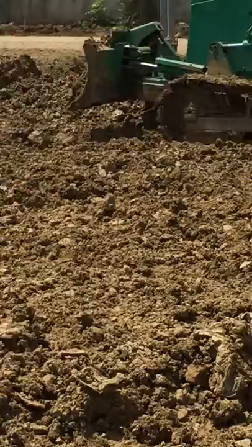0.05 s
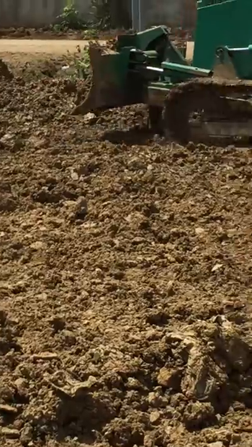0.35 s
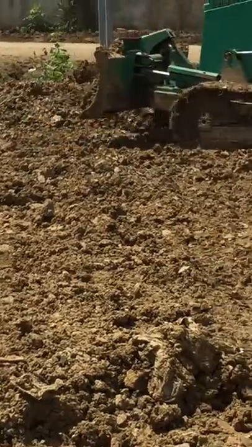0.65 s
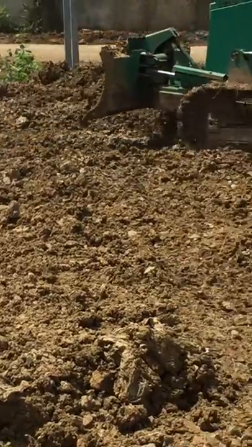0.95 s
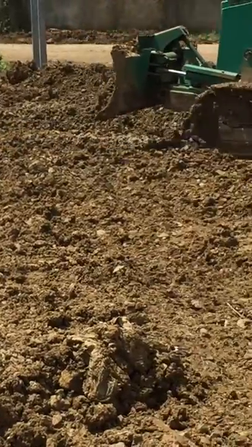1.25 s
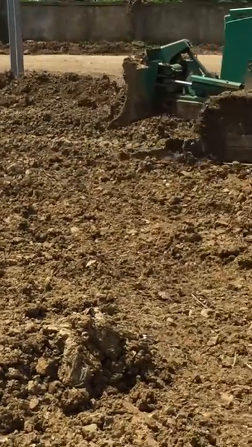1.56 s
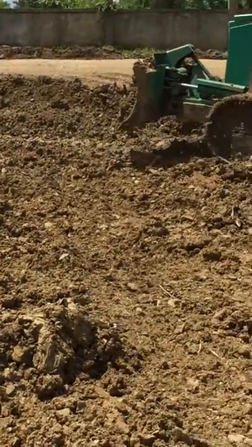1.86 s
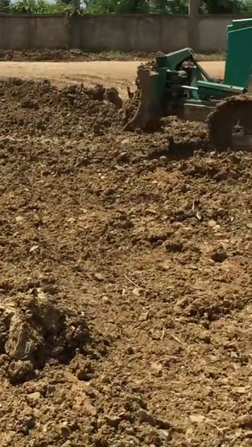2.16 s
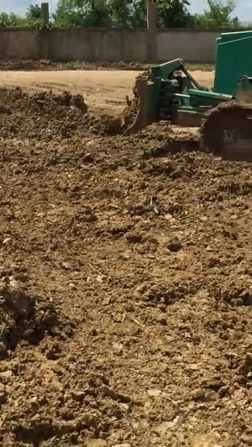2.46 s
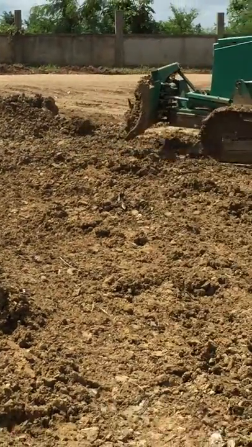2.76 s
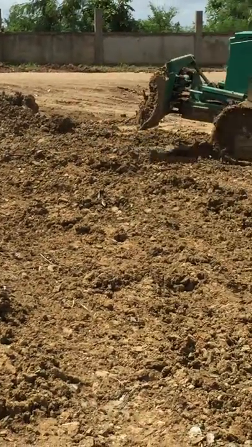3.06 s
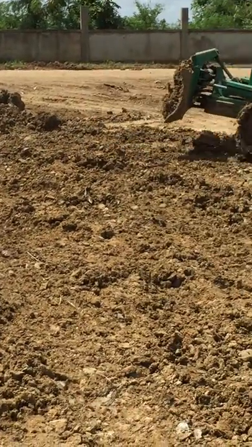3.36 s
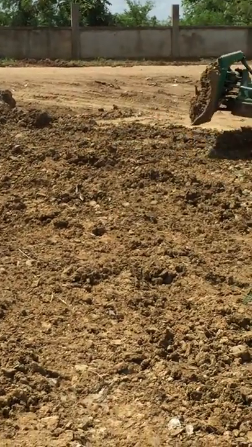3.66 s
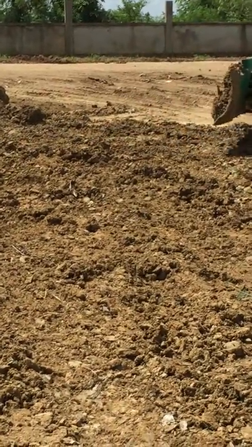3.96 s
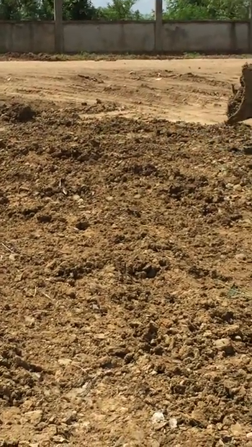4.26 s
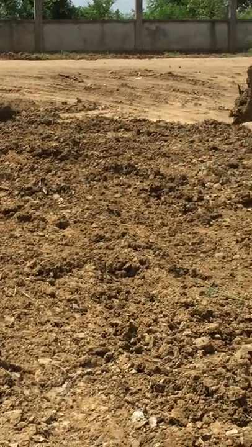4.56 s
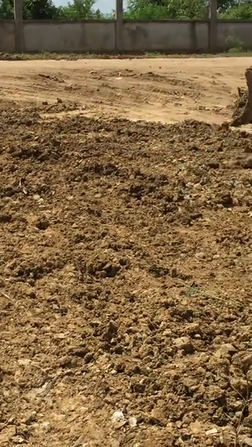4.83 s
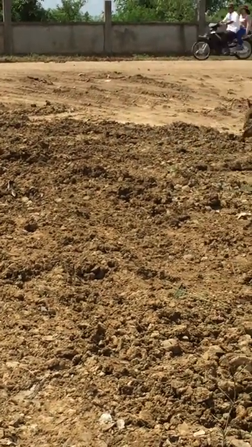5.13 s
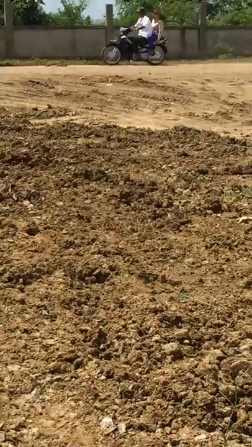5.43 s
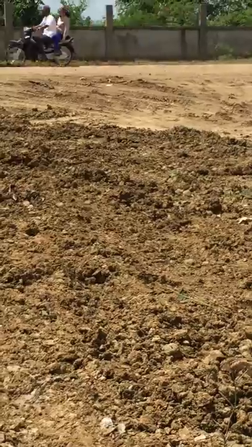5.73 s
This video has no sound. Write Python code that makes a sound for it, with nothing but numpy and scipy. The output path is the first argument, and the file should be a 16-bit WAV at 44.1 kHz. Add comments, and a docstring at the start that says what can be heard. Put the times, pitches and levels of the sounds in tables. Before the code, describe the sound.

A small bulldozer's diesel drones and throbs while its steel tracks rattle, clank and squeal over stony soil, then the clatter falls away.

```python
"""A small bulldozer crawls over an open dirt lot, about ten metres away. From the start its four-cylinder
diesel drones through the exhaust and the block knocks with every firing; within a second the throb of
one weak cylinder grows. For two seconds the blade grinds through stony soil. The steel tracks rattle,
clank and now and then squeal, crushing clods and pebbles, with a faint echo off a far wall. After five
seconds the machine slows: the clatter falls away, dry pins squeal and the engine runs free."""
import sys
import numpy as np
from scipy import signal
from scipy.fft import rfft, irfft
from scipy.io import wavfile

SR = 44100
rng = np.random.default_rng(int(sys.argv[2]) if len(sys.argv) > 2 else 0)


def transcribe(u):
    """Save the signal u as a 16-bit wav file named by the first command-line argument.

    u: samples, shape (n,) or (channels, n), limited to [-1, 1]; the rate is SR.
    q: integer samples, one column per channel.
    """
    v = np.clip(np.atleast_2d(u).T, -1, 1)
    q = np.round(v * 32767).astype(np.int16)
    wavfile.write(sys.argv[1], SR, q)


N = 259749
T = np.arange(N) / SR

# The blade grinding through stony soil. Each row: time in seconds, level in dB.
GRIND_LEVELS = [(0, -38.5), (.65, -37.5), (1.3, -46.5), (1.9, -44), (2.4, -71)]
# The ring of the blade. Each row: pitch in Hz, relative level in dB, 60 dB decay in seconds.
BLADE_MODES = [(971, -11, 0.1), (1230, -3.5, 0.033), (1567, -3, 0.026), (1700, -21, 0.016),
               (1990, -1, 0.012), (2390, -7, 0.013), (2920, -17, 0.052), (3370, -4.5, 0.0064)]
# The colour of crushed soil and grit. Each row: frequency in Hz, relative level in dB.
SOIL_COLOUR = [(500, 13.5), (1500, 9), (2800, 18.5), (4300, -7), (5000, -15), (6200, 4), (7500, -3),
               (9700, 3.5), (10500, -2), (12500, 1), (15500, -7)]
# A steel edge scraped by grit. Each row: pitch in Hz, relative level in dB, 60 dB decay in seconds.
EDGE_MODES = [(3600, 1, .007), (4480, 1, .012), (5650, 0, .006), (6500, -2, .004), (7400, -4, .003),
              (9400, -7, .005)]
# Clods crushed under the shoes. Each row: start and length in seconds, grit and scrape in relative dB.
CLODS = [(0.612, 0.037, -51, -46), (0.647, 0.052, -53, -51), (0.71, 0.04, -50, -43), (0.92, 0.03, -54, -51),
         (1.028, 0.058, -54, -50), (1.135, 0.078, -54, -51), (1.606, 0.03, -57, -52),
         (1.68, 0.035, -52, -42), (1.72, 0.125, -54, -46.5), (1.918, 0.036, -57, -50),
         (2.121, 0.042, -54, -51), (2.19, 0.07, -57, -51), (2.325, 0.044, -55, -51),
         (2.387, 0.042, -53, -50), (2.48, 0.058, -53, -48), (2.774, 0.048, -54, -51),
         (2.86, 0.032, -57, -52), (2.897, 0.032, -56, -51), (2.975, 0.044, -51, -51),
         (3.23, 0.025, -58, -52), (3.324, 0.058, -56, -51), (3.461, 0.04, -50, -42.5),
         (3.562, 0.05, -54, -49), (3.809, 0.032, -56, -54), (4.067, 0.056, -53, -48),
         (4.125, 0.032, -57, -50), (4.204, 0.05, -54, -47), (4.328, 0.022, -54, -47),
         (4.41, 0.115, -54, -47), (4.981, 0.062, -54, -48)]
# Dry track pins squealing. Each row: start and length in seconds, first and last pitch in Hz,
# level in dB, pitch waver in Hz.
SQUEALS = [(0.124, 0.26, 15700, 15700, -47.5, 40), (.618, .009, 7030, 6960, -44, 120),
           (0.717, 0.012, 5980, 5940, -40, 260), (2.983, 0.01, 7460, 7440, -51, 150),
           (3.672, .12, 14910, 15020, -55, 50), (3.736, .073, 15620, 15500, -57, 50),
           (4.307, 0.023, 6540, 6520, -40, 36), (4.934, .06, 15740, 15700, -52, 28),
           (5.055, 0.15, 2680, 2670, -48.5, 26), (5.06, 0.16, 14690, 14640, -57, 28),
           (5.08, .08, 8030, 8000, -63, 20), (5.24, .045, 5860, 5740, -55, 20),
           (5.245, 0.071, 11600, 11350, -61, 50), (5.275, 0.07, 5690, 5680, -47, 22),
           (5.335, .06, 5750, 5700, -54, 30), (5.385, 0.075, 5685, 5680, -52, 16),
           (5.45, .06, 5690, 5730, -55, 20), (5.666, 0.03, 6710, 6600, -56, 200),
           (5.68, .03, 7850, 8000, -61, 200), (5.708, .022, 7500, 6950, -55, 300),
           (5.756, 0.07, 12950, 12450, -53, 130), (5.785, .035, 11800, 11700, -52, 150)]
# The pace of the tracks. Each row: time in seconds, shoes laid down per second.
SHOE_PACE = [(0, 9.2), (1.4, 9.2), (2.1, 10.5), (2.7, 10), (3.2, 8), (3.85, 11), (4.5, 9.5), (5.89, 9.4)]
# The work of the tracks, dropping as the machine slows. Each row: time in seconds, then frame thud,
# shoe ring and crumbling soil in relative dB.
TRACK_LEVELS = [(0, -43.5, -49, -61), (.5, -38.5, -44, -60), (.85, -36, -45, -52.5), (1.3, -37.5, -45, -59),
                (1.9, -38.5, -44.5, -60), (2.6, -36, -42, -57), (3.1, -42, -48.5, -63),
                (4.25, -39.5, -40.5, -57), (5.0, -45, -43.5, -59), (5.3, -49.5, -43.5, -57.5),
                (5.5, -65, -56, -67)]
# The colour of the rattling track frame. Each row: frequency in Hz, relative level in dB.
FRAME_COLOUR = [(120, -7.5), (220, 12.5), (330, 9.5), (430, 7.5), (520, 10.5), (700, -6), (880, -3),
                (1100, 3), (1500, -13), (2300, -20), (3500, -23), (6000, -30), (12000, -52)]
# The free ring of a track shoe. Each row: pitch in Hz, relative level in dB, 60 dB decay in seconds.
SHOE_MODES = [(301, 0.5, 0.043), (327, -2.5, 0.14), (381.7, -2.5, 0.16), (505, -20, 0.44),
              (549, 2.5, 0.076), (658, 3, 0.046), (778, 2.5, 0.038), (876, 2, 0.049), (1004, 9.5, 0.032),
              (1085, -3.5, 0.092), (1190, -4, 0.076), (1344, -1.5, 0.12), (1440, 2, 0.052),
              (1930, -18, 0.074), (2050, 7.5, 0.0079), (2270, -12, 0.19), (2800, -9.5, 0.018),
              (3530, -38, 0.036)]
# Steel cracking on steel, before each blow retunes it. Each row: frequency in Hz, relative level in dB.
CRACK_COLOUR = [(500, -18), (1200, 7.5), (1800, 6), (2300, 12), (2900, 3.5), (3700, 2), (4400, -2.5),
                (5300, -17), (9000, -22), (15000, -28)]
# Shoes striking rollers and sprocket. Each row: start in seconds, ring level in dB, ring focus in Hz,
# thud level in dB, crack level in dB, crack peak in Hz.
CLANKS = [(.39, -29, 400, -28, -46, 1600), (.496, -28, 420, -27, -46, 1600),
          (.6, -27, 1230, -33, -44, 1600), (.654, -27, 1100, -34, -44, 1600),
          (.712, -36, 1020, -38, -29, 2600), (.729, -24, 1100, -36, -38, 2300),
          (.828, -26, 500, -23, -39, 2300), (.91, -26, 530, -29, -46, 1600),
          (.952, -25.5, 900, -27, -42, 1600), (1.035, -23, 1320, -38, -26, 2000),
          (1.058, -25, 1000, -23, -42, 1600), (1.124, -27, 1080, -26, -44, 1800),
          (1.159, -26, 1010, -28, -44, 1800), (1.256, -24, 1240, -31, -39, 1600),
          (1.272, -25, 600, -24, -45, 1600), (1.358, -26, 484, -33, -30, 1900),
          (1.385, -22, 1000, -30, -44, 1600), (1.479, -21, 1210, -21, -28.5, 2000),
          (1.558, -25, 560, -28, -46, 1600), (1.591, -26, 500, -30, -46, 1600),
          (1.659, -19, 1100, -38, -41, 1500), (1.695, -24, 790, -30, -36, 2600),
          (1.768, -22, 1090, -37, -48, 1600), (1.795, -19, 1050, -20, -26, 2300),
          (1.872, -25, 585, -25, -46, 1600), (1.909, -28, 510, -24, -24, 2500),
          (2.034, -26, 480, -24, -42, 1600), (2.07, -25, 400, -26, -46, 1600),
          (2.149, -26, 690, -30, -37, 1800), (2.267, -22, 500, -26, -44, 1600),
          (2.337, -26, 500, -24, -42, 1800), (2.405, -22, 720, -36, -44, 1600),
          (2.48, -26, 590, -36, -35, 2300), (2.526, -24, 450, -27, -44, 1600),
          (2.585, -18, 690, -19, -29, 2100), (2.647, -23, 1000, -28, -36, 1700),
          (2.698, -15.5, 1180, -23, -30, 1400), (2.789, -26, 775, -27, -40, 2300),
          (2.876, -17, 910, -19, -42, 1500), (2.909, -26, 500, -23, -40, 1800),
          (3.002, -16, 730, -26, -30, 2000), (3.23, -25, 500, -24, -42, 2300),
          (3.272, -21, 1100, -31, -42, 1500), (3.305, -22, 1020, -29, -38, 1600),
          (3.342, -18, 1020, -24, -38, 1600), (3.441, -25, 730, -27, -48, 1600),
          (3.478, -15.5, 700, -24, -34, 1800), (3.668, -19.5, 950, -20, -38, 1400),
          (3.712, -24, 495, -26, -27, 2200), (3.763, -21, 520, -24, -40, 1800),
          (3.849, -25, 720, -25, -44, 1600), (3.887, -25, 600, -24, -44, 1600),
          (4.032, -23, 835, -32, -46, 1600), (4.074, -21, 820, -33, -35, 3600),
          (4.126, -22, 820, -31, -39, 2300), (4.211, -21, 700, -33, -30, 2300),
          (4.236, -19.5, 820, -20, -33, 2300), (4.292, -23, 1200, -25, -28.5, 3100),
          (4.333, -20, 745, -38, -32, 2400), (4.399, -24, 680, -27, -44, 1600),
          (4.429, -25, 570, -24, -40, 2300), (4.472, -23, 880, -30, -26.5, 2100),
          (4.829, -26, 660, -25, -46, 1600), (4.869, -25, 500, -25, -40, 2300),
          (5.034, -24, 850, -29, -38, 1800), (5.262, -26, 805, -30, -46, 1600)]
# The combustion knock of the block. Each row: time in seconds, relative level in dB.
KNOCK_LEVELS = [(0, -44), (2, -39), (4.8, -38.5), (5.5, -43.5), (5.89, -41.5)]
# The colour of the block and its fan. Each row: frequency in Hz, relative level in dB.
BLOCK_COLOUR = [(150, -17.5), (350, -.5), (460, -2.5), (600, -2.5), (700, 5.5), (820, 4.5), (930, -3),
                (1050, -5), (1200, 4.5), (1400, -1), (1800, -1.5), (2100, -3.5), (2900, -8.5),
                (4000, -16.5), (6500, -20.5), (9700, -28.5), (10500, -31), (15500, -29.5)]
# The ring of the engine covers. Each row: pitch in Hz, relative level in dB, 60 dB decay in seconds.
COVER_MODES = [(700, 2, 0.017), (824, -5, 0.016), (1140, -20, 0.03), (1190, -7, 0.036), (1508, -3.5, 0.081),
               (1730, -34, 0.015), (1800, 3.5, 0.028), (2384, -16, 0.066), (2670, -21, 0.023)]
# Casing tones locked to the shaft. Each row: time in seconds, hum in dB, gear whine in dB.
CASING_LEVELS = [(0, -51, -55), (3, -54.5, -48), (4.3, -55, -76), (5.05, -54, -53), (5.35, -44.5, -52),
                 (5.89, -46, -51.5)]
# The casing hum and the gear whine. Each row: multiple of the firing rate, relative level in dB.
HUM_PARTIALS = [(6, 0), (12, -12), (13, -16), (14, -15)]
GEAR_PARTIALS = [(20, 0), (22, -8), (27, -9)]
# The colour of turbulent exhaust gas. Each row: frequency in Hz, relative level in dB.
GAS_COLOUR = [(20, -44), (40, -15), (70, -5), (130, -2.5), (195, -1), (250, -9), (400, -21.5), (800, -65)]
# The bark of the exhaust. Each row: multiple of the firing rate, relative level in dB.
BARK_PARTIALS = [(3, 3.5), (4, -12.5)]
# The exhaust layers around the drone. Each row: time in seconds, then boom, bark and gas in dB.
EXHAUST_LEVELS = [(0, -34.5, -47, -32), (.4, -27.5, -45, -35), (.9, -33, -45, -36), (2.6, -31.5, -41, -32),
                  (3.5, -31.5, -38, -33), (4.2, -33, -35, -32.5), (5.15, -31, -39, -32.5),
                  (5.45, -31, -37.5, -39.5), (5.89, -34, -39, -38)]
# The four cylinders in firing order. Each entry: relative strength in dB.
CYLINDER_DB = [-8, 4, 2.5, 5]
# The throb grows as the engine picks up. Each row: time in seconds, share of the unevenness heard.
THROB_DEPTH = [(0, 0.41), (.5, 0.69), (.9, 0.94)]
# The pace of the diesel, sagging under load. Each row: time in seconds, firing rate in Hz.
FIRING_RATE = [(0.0, 52.49), (0.55, 54.06), (0.65, 56.87), (1.25, 56.33), (1.35, 56.7), (2.85, 56.28),
               (2.95, 56.85), (3.35, 56.75), (3.65, 57.65), (3.95, 55.83), (4.35, 55.7), (5.05, 54.07),
               (5.15, 57.48), (5.89, 56.98)]


def undb(db):
    """Decibels to gain."""
    return 10 ** (np.asarray(db) / 20)


def unit(x):
    """Scale to rms 1."""
    return x / np.sqrt(np.mean(x ** 2) + 1e-18)


def curves(table):
    """One automation curve for each column after the time column."""
    times, *columns = np.transpose(table)
    return [np.interp(T, times, column) for column in columns]


def colour(x, points):
    """Causal EQ through (Hz, dB) points; the result has rms 1."""
    hz, db = np.transpose(points)
    size = 4096
    log_hz = np.log(np.fft.rfftfreq(size, 1 / SR) + 1)
    cepstrum = irfft(np.log(undb(np.interp(log_hz, np.log(hz), db))))
    cepstrum[1:size // 2] *= 2  # fold to minimum phase
    cepstrum[size // 2 + 1:] = 0
    impulse = irfft(np.exp(rfft(cepstrum)))
    return unit(signal.fftconvolve(x, impulse)[:len(x)])


def drift(rate):
    """Random drift of rms 1, heading for a new value `rate` times a second."""
    steps = rng.standard_normal(4096)
    return unit(np.interp(T * rate, np.arange(len(steps)), steps))


def fade(x, t60):
    """Give every impulse an exponential tail."""
    return signal.lfilter([1], [1, -np.exp(-np.log(1000) / (t60 * SR))], x)


def ring(x, hz, t60):
    """Ring one decaying mode."""
    pole = np.exp((2j * np.pi * hz - np.log(1000) / t60) / SR)
    return signal.lfilter([0, pole.imag], [1, -2 * pole.real, abs(pole) ** 2], x)


def resonate(contact, modes):
    """Rough contact rings each mode with its own noise; the result has rms 1."""
    return unit(sum(undb(db) * ring(contact * rng.standard_normal(N), hz, t60) for hz, db, t60 in modes))


def knocks(rate, spread_db):
    """Random impulses, about `rate` a second, a few stronger than the rest."""
    return (rng.random(N) < rate / SR) * undb(spread_db * np.minimum(rng.exponential(size=N), 2))


def tones(phase, partials, waver_db):
    """Sines on whole multiples of the firing phase, each wavering in level."""
    return sum(undb(db + waver_db * drift(9.2)) * np.sin(round(k) * phase) for k, db in partials)


def hull(x, t60=0.09):
    """Sound bounces briefly between track, hull and blade; the paths shift as the machine moves."""
    t = T[:SR // 8]
    out = 0
    for _ in range(4):
        bounces = rng.standard_normal(len(t)) * (rng.random(len(t)) < 700 / SR)
        bounces *= np.exp(-np.log(1000) * t / t60)
        out = out + drift(5.03) * signal.fftconvolve(x, bounces / np.linalg.norm(bounces))[:N]
    return out / 2


def blade():
    """Stones slip along the steel plate in quick jerks and make it rasp."""
    grind_db, = curves(GRIND_LEVELS)
    slips = knocks(rate=600, spread_db=1.5)
    return resonate(slips, BLADE_MODES) * undb(grind_db)


def pebbles(rate=800, low_hz=3300, high_hz=9000, ring_cycles=9):
    """Small stones snap in short ticks, each with its own pitch and size; the result has rms 1."""
    out, t = np.zeros(N + SR), T[:SR // 100]
    for when, pitch, size in rng.random((int(rate * N / SR), 3)):
        cycles = t * low_hz * (high_hz / low_hz) ** pitch
        size_db = -1.8 * np.log(size + .02)
        tick = np.exp(-cycles / ring_cycles) * np.sin(2 * np.pi * cycles)
        start = int(when * N)
        out[start:start + len(t)] += undb(size_db) * tick
    return unit(out[:N])


def crushing(crumble_db, clod_db, attack_s=.018, release_s=.045):
    """How hard soil is breaking, in dB: over the crumbling, each clod bursts, holds and trickles out."""
    power = undb(crumble_db) ** 2
    for (start, length, *_), db in zip(CLODS, clod_db):
        attack = np.clip((T - start) / attack_s + .5, 0, 1)
        release = np.clip((start + length - T) / release_s + .5, 0, 1)
        power = power + (undb(db) * attack * release) ** 2
    return 10 * np.log10(power)


def soil(crumble_db):
    """Clods, grit and pebbles break in tiny grains under the shoes and scrape their steel edges."""
    _, _, grit_db, scrape_db = np.transpose(CLODS)
    grains = fade(knocks(rate=1000, spread_db=2.7), t60=.009) * undb(1.5 * drift(55))
    grit = colour(grains * rng.standard_normal(N), SOIL_COLOUR)
    stones = resonate(grains, EDGE_MODES) * undb(-1.5) + pebbles()
    return grit * undb(crushing(crumble_db, grit_db) + 8.5) + stones * undb(crushing(crumble_db, scrape_db))


def squeals():
    """A dry pin sticks and slips at one high pitch, wavering as it turns; the rougher slips rasp."""
    out = np.zeros(N)
    waver, flutter = drift(600), undb(2.2 * drift(70))
    for start, length, start_hz, end_hz, db, waver_hz in SQUEALS:
        on = (T > start) & (T < start + length)
        progress = (T[on] - start) / length
        hz = start_hz + (end_hz - start_hz) * progress + waver_hz * waver[on]
        envelope = np.sqrt(2 * np.sin(np.pi * progress)) * undb(db) * flutter[on]
        out[on] += envelope * np.sin(2 * np.pi * np.cumsum(hz) / SR)
    return out


def shoe_beat(landing_s=0.3963, swing_db=4, scatter_db=.8):
    """The swell of the rattle as each shoe lands, in dB; no two shoes land alike."""
    rate, = curves(SHOE_PACE)
    shoes = np.cumsum(rate) / SR
    shoes -= np.interp(landing_s, T, shoes)  # one shoe lands at this moment
    return swing_db * np.cos(2 * np.pi * shoes) + scatter_db * drift(10)


def rattle(thud_db, ring_db):
    """Loose links keep knocking; each knock thuds in the frame and rings its own mix of shoe modes."""
    hits = knocks(rate=190, spread_db=1.8)
    thud = colour(fade(hits, t60=0.11) * rng.standard_normal(N), FRAME_COLOUR)
    return thud * undb(thud_db) + resonate(hits, SHOE_MODES) * undb(ring_db)


def struck_shoe(t, focus_hz):
    """A struck shoe rings, favouring the modes near the focus; earth on the steel shortens the ring."""
    hz, db, t60 = np.transpose(SHOE_MODES)[:, :, None]
    detune, size, side = rng.standard_normal((3, len(SHOE_MODES), 1))
    focus = 0.25 + np.exp(-(np.log(hz / focus_hz) / 0.15) ** 2)
    weight = undb(db + 2.7 * size) * focus
    decay = undb(-60 * t / (.8 * t60))
    modes = weight * np.sign(side) * decay * np.sin(2 * np.pi * hz * (1 + 0.041 * detune) * t)
    return modes.sum(axis=0) / np.linalg.norm(weight)


def clanks(thud_t60=0.045, crack_t60=0.024, cushion_s=.0035):
    """Shoes hit rollers and sprocket: a steel ring, a dull thud and a bright crack with a rebound."""
    out, t = np.zeros(N + SR), T[:SR // 4]
    cushion = 1 - np.exp(-t / cushion_s)  # packed earth softens the heavy part of the blow
    for start_s, ring_db, focus_hz, thud_db, crack_db, crack_hz in CLANKS:
        thud_noise, crack_noise = rng.standard_normal((2, len(t)))
        steel = struck_shoe(t, focus_hz) * undb(ring_db)
        thud = colour(thud_noise, FRAME_COLOUR) * undb(thud_db - 60 * t / thud_t60)
        contact = undb(crack_db - 60 * t / crack_t60)
        # the loose shoe falls back once
        rebound = undb(-10) * np.interp(t - rng.uniform(.005, .012), t, contact, left=0)
        retuned = np.multiply(CRACK_COLOUR, [crack_hz / 2300, 1])  # slide the peak to crack_hz
        crack = colour(crack_noise, retuned) * (contact + rebound)
        start = int(start_s * SR)
        out[start:start + len(t)] += (steel + thud) * cushion + crack
    return out[:N]


def casing(phase):
    """The casing hums and the gears whine, locked to the shaft."""
    hum_db, whine_db = curves(CASING_LEVELS)
    hum = tones(phase, HUM_PARTIALS, waver_db=1.2) * undb(hum_db)
    whine = tones(phase, GEAR_PARTIALS, waver_db=1.0) * undb(whine_db)
    return hum + whine


def block(firings, strength):
    """A burst of knock follows each firing and rings the covers, over the steady rush of the fan."""
    knock_db, = curves(KNOCK_LEVELS)
    since_knock = (firings - .52) % 1  # in firing cycles
    burst = 1.4 + np.sqrt(strength) * np.exp(-since_knock / 0.24) * undb(2 * drift(56))
    rush = colour(rng.standard_normal(N) * burst, BLOCK_COLOUR)
    return rush * undb(knock_db - 1) + resonate(burst, COVER_MODES) * undb(knock_db - 8)


def diesel(first_firing_s=.0024):
    """Exhaust pulses drone, unequal cylinders make them throb, and every firing knocks the block."""
    hz, = curves(FIRING_RATE)
    depth, = curves(THROB_DEPTH)
    boom_db, bark_db, gas_db = curves(EXHAUST_LEVELS)
    firings = np.cumsum(hz) / SR - first_firing_s * hz[0]
    phase = 2 * np.pi * firings
    cylinder = np.floor(firings).astype(int)
    strengths = unit(undb(CYLINDER_DB))
    current, following = strengths[cylinder % 4], strengths[(cylinder + 1) % 4]
    # the pressure in the silencer passes smoothly from one cylinder to the next
    blend = np.sin(np.pi / 2 * (firings % 1)) ** 2
    pressure = (1 - blend) * current + blend * following
    throb = 1 + depth * (pressure - 1)
    drone = throb * np.sin(2 * phase) * undb(-23 + .5 * drift(45))
    boom = np.cos(phase + np.pi / 4) * undb(boom_db + 0.4 * drift(23.36))
    # alternate firings differ, which sounds halfway between boom and drone
    lope = -np.sin(1.5 * phase) * undb(-50)
    # the pipe resonance swells a little after each pulse
    swell = np.interp(T - .007, T, throb)
    bark = tones(phase + np.pi / 12, BARK_PARTIALS, waver_db=-1.0) * swell * undb(bark_db)
    tonal = np.sqrt(2) * (drone + boom + lope + bark + casing(phase))
    gas = colour(rng.standard_normal(N) * swell, GAS_COLOUR) * undb(gas_db)
    return tonal + gas + block(firings, current)


def scene():
    """Blade, tracks and engine in the open; the far wall returns a faint echo of the clatter and blows."""
    thud_db, ring_db, crumble_db = curves(TRACK_LEVELS)
    beat_db = shoe_beat()
    links = rattle(thud_db + beat_db, ring_db + beat_db)
    clatter = links + soil(crumble_db + 2 * drift(30)) + blade()
    blows = clanks()  # up front: they land on the near track, in plain view
    tracks = clatter * undb(-3) + blows + hull(clatter + blows) * undb(-8.5)
    echo = np.interp(T - .055, T, tracks, left=0) * undb(-11.5)
    return (diesel() + tracks + squeals() + echo)[None]


def record(dry):
    """A steep low-pass takes off the top above 15.8 kHz."""
    return signal.sosfilt(signal.ellip(10, .2, 80, 15800, fs=SR, output="sos"), dry)


dry = scene()
out = record(dry)
transcribe(out)
```